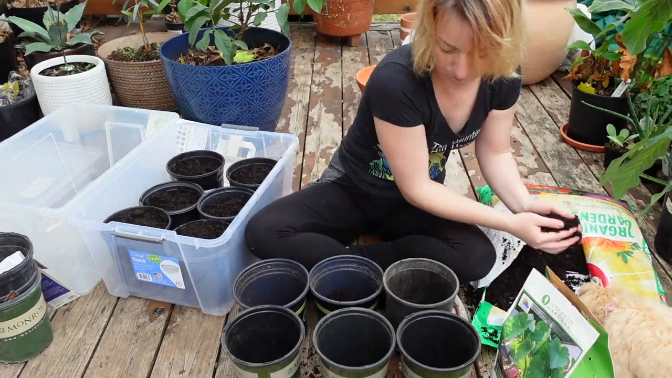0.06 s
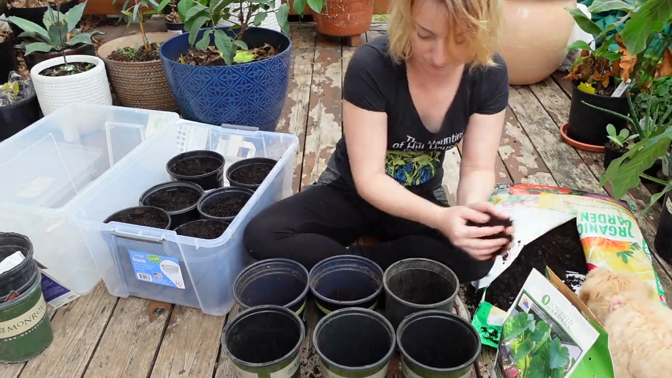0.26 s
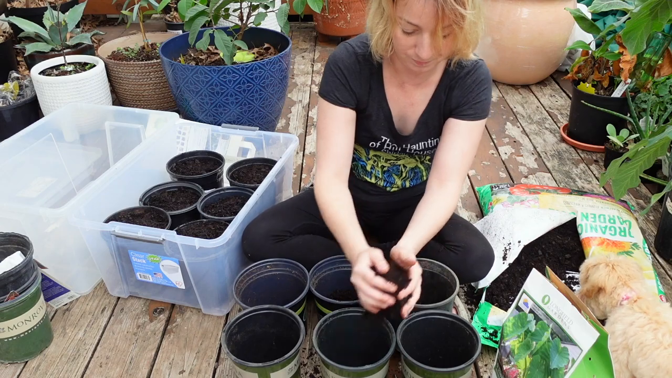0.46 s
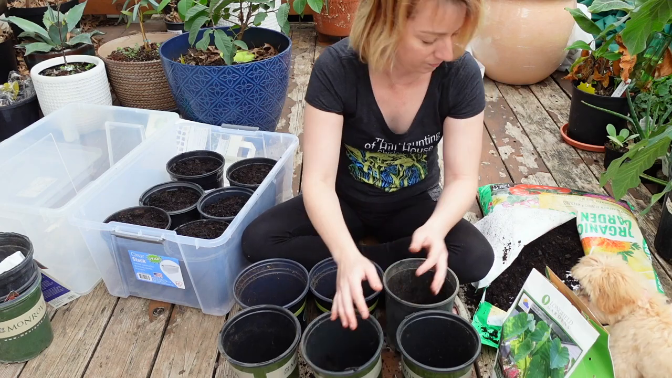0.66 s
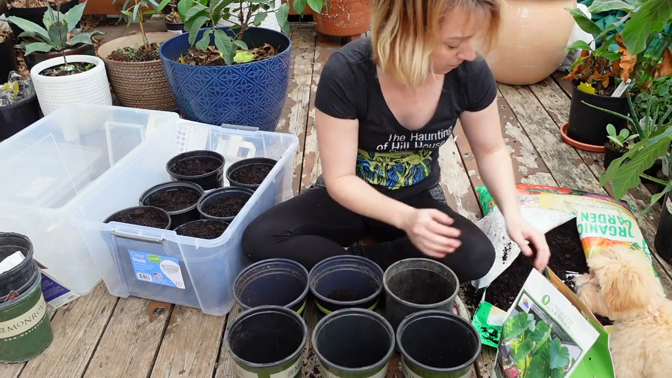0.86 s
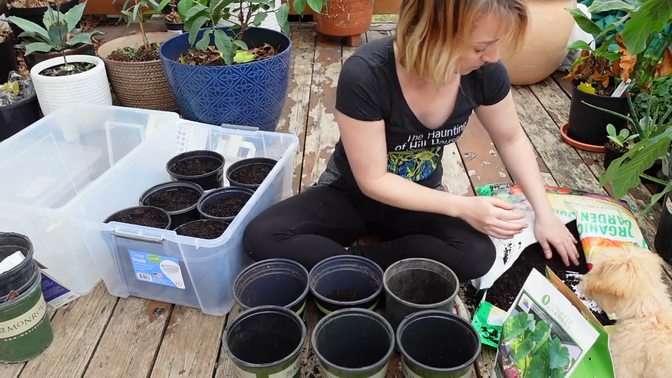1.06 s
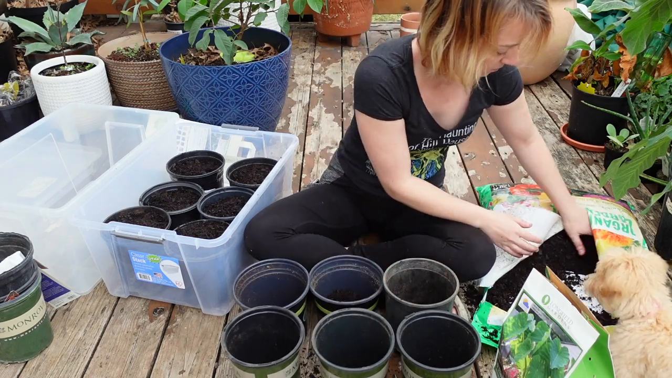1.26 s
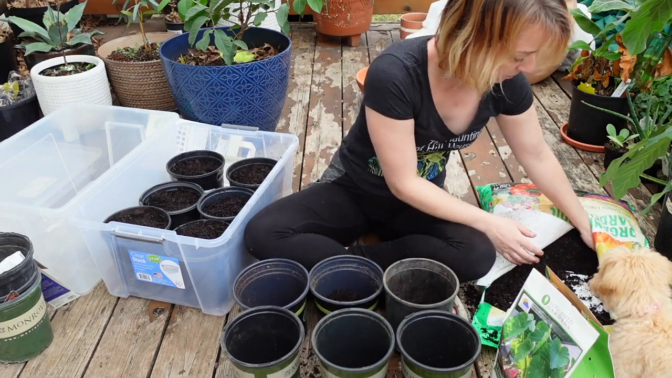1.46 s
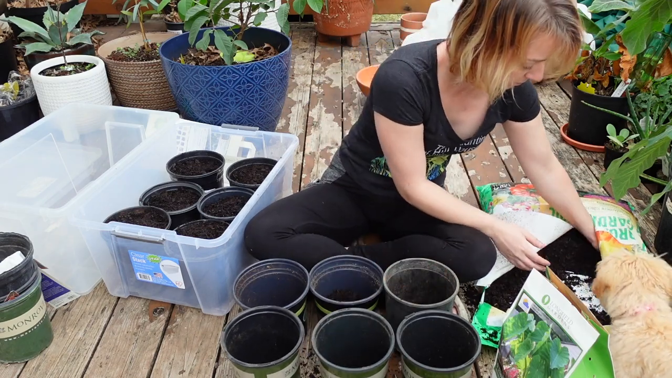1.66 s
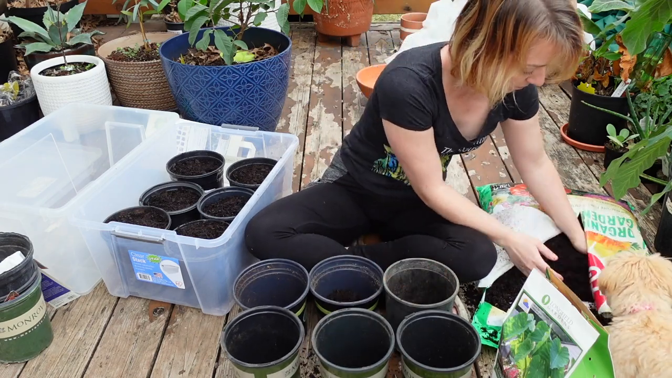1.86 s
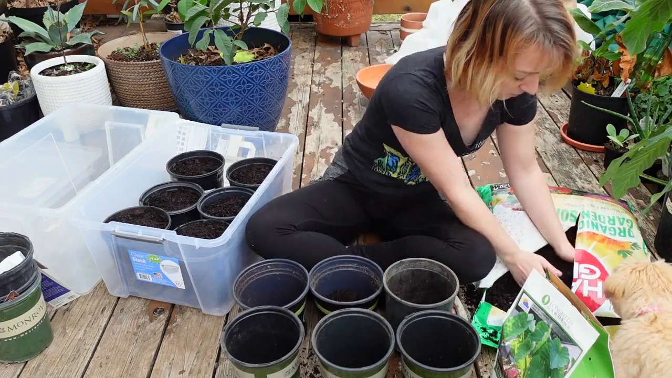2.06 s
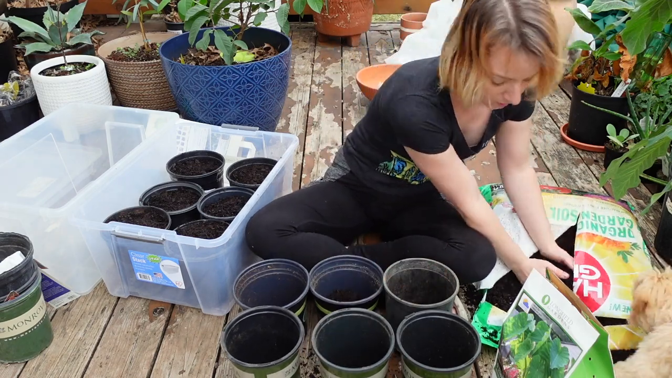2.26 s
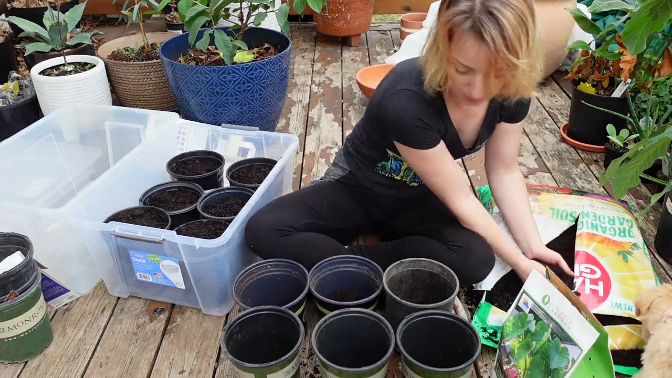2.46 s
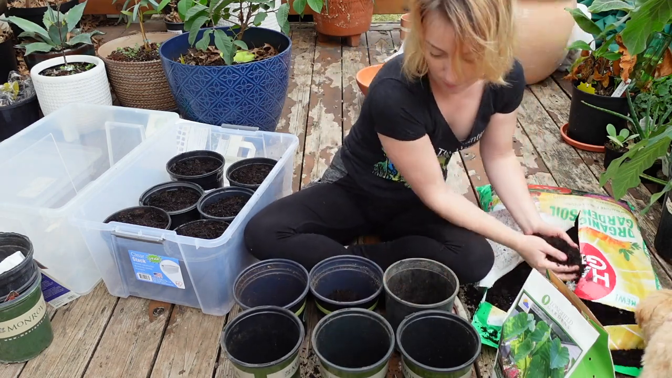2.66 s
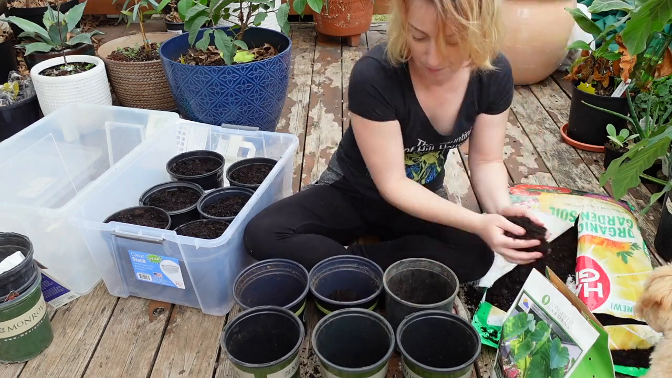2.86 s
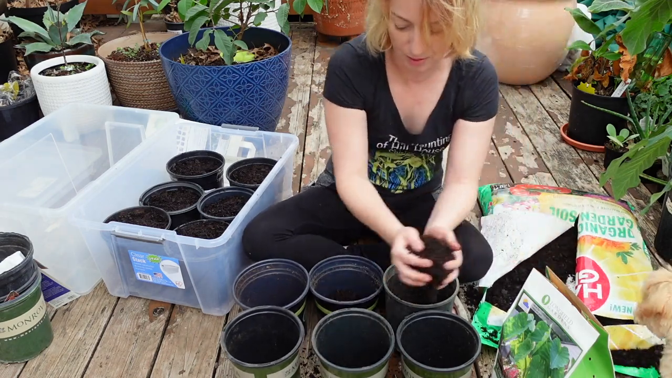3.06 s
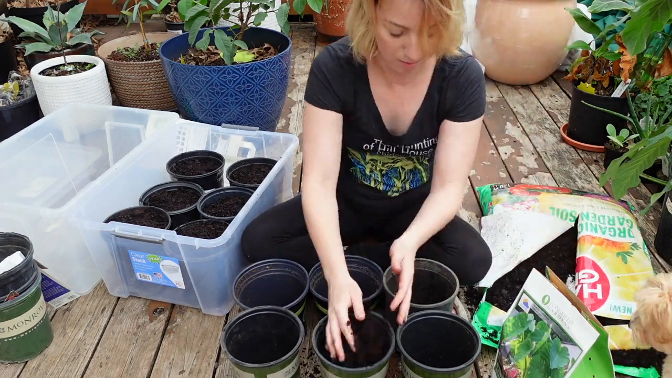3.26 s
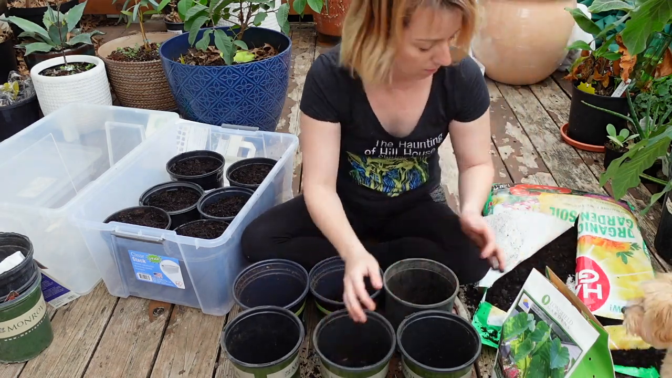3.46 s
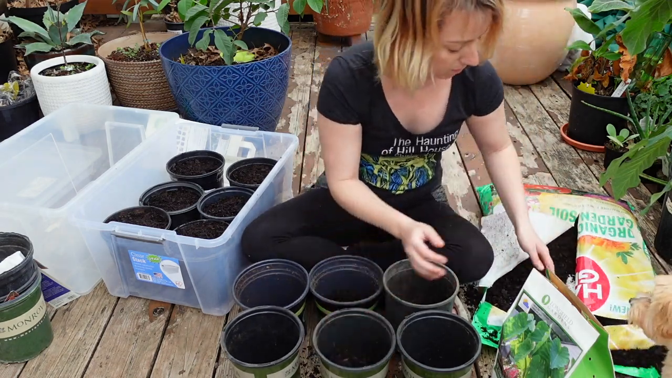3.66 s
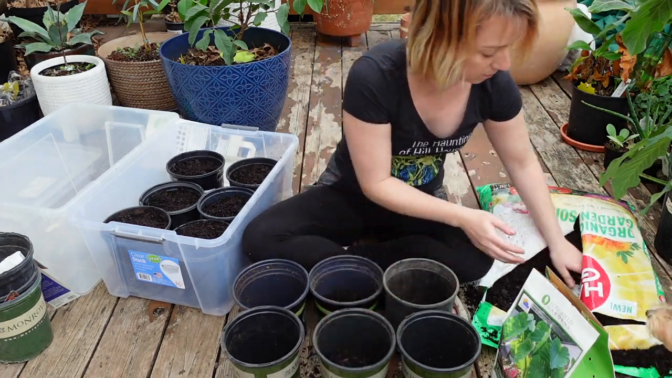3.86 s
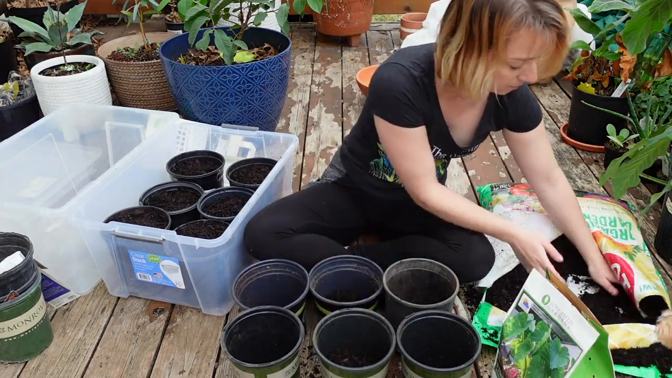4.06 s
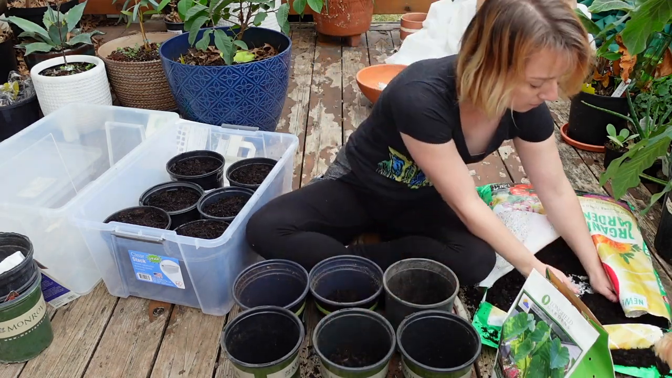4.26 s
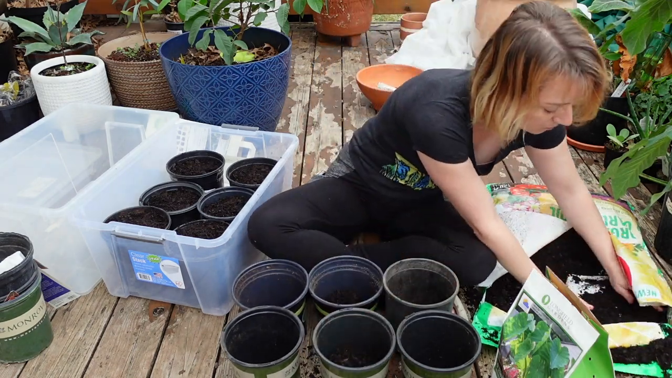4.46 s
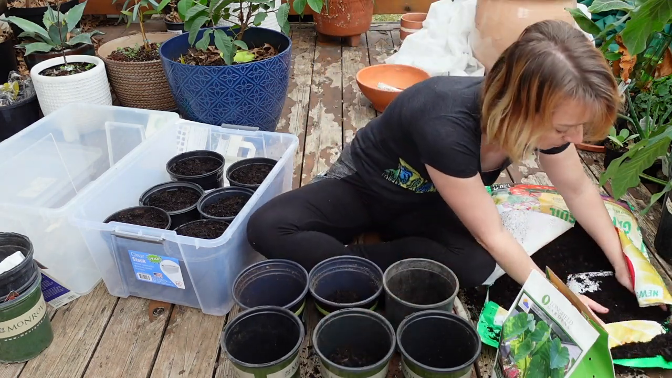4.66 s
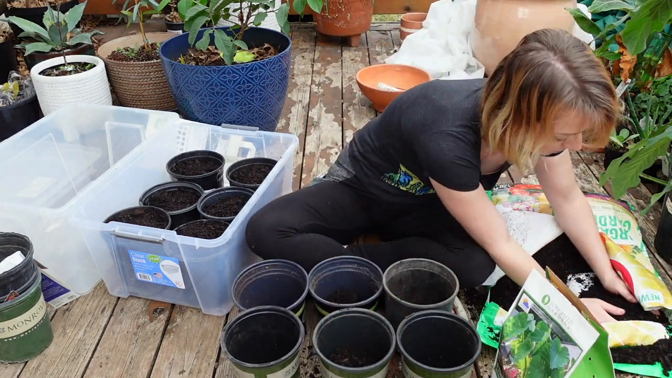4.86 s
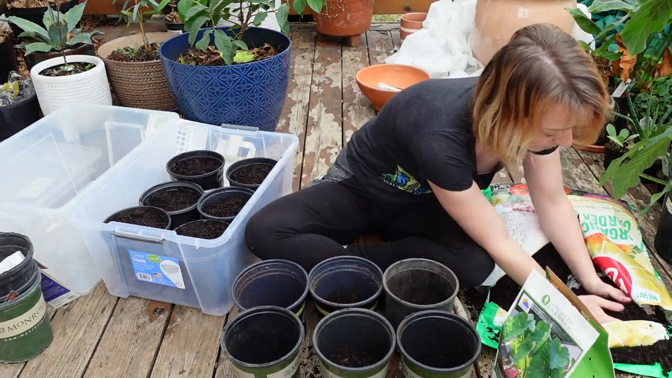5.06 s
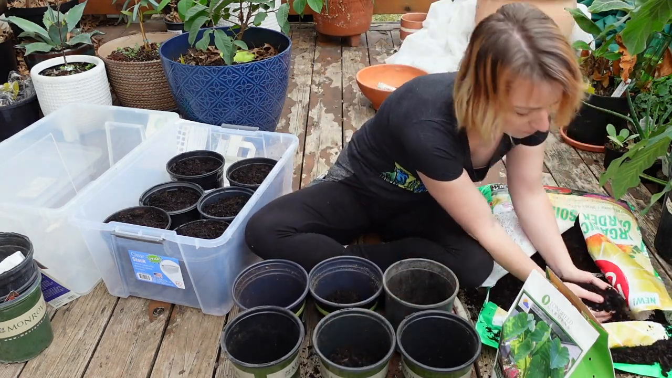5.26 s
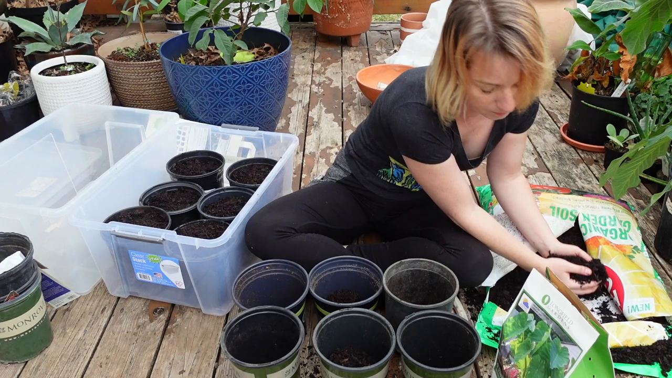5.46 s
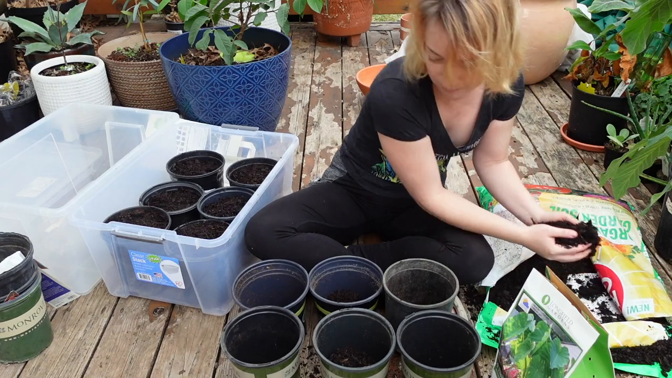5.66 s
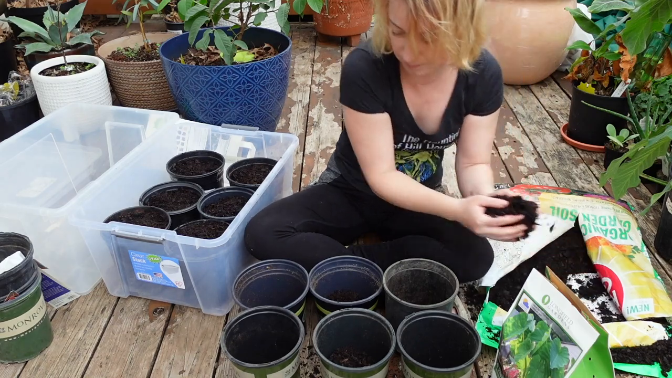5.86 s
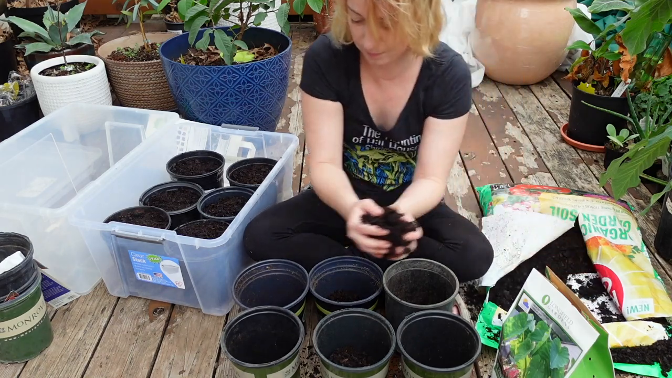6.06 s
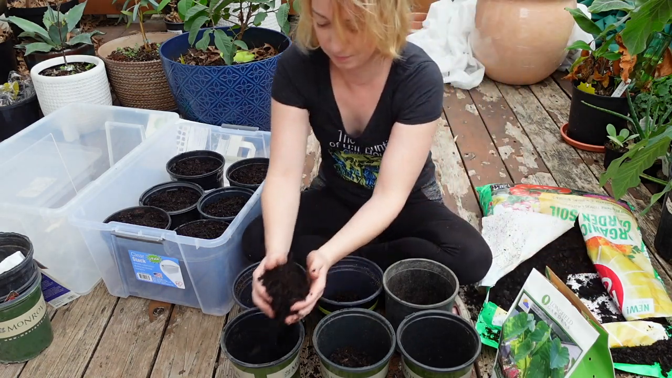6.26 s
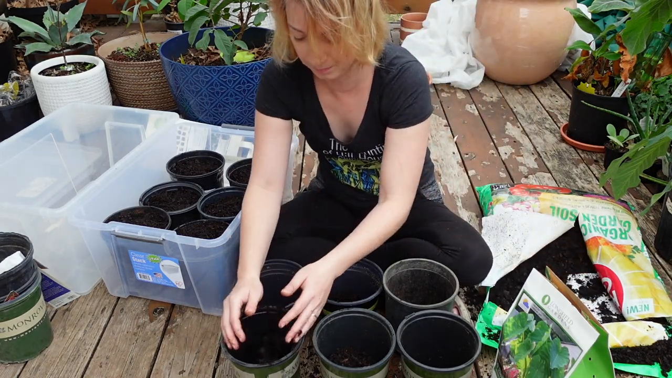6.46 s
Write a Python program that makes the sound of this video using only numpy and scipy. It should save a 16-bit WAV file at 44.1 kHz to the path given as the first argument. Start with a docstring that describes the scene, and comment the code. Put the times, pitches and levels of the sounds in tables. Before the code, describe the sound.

Hands scrape dry soil from a crinkling plastic bag and drop it crisply into thin pots while a songbird whistles falling phrases outdoors.

```python
"""Potting soil by hand

Hands dig dry soil out of a plastic bag (ticks and hiss ring a bank of bands) and drop it into thin plastic
pots on a deck (crumbs ring wall and hollow); single crumbs snap and bumped pots boom.
A songbird whistles falling three-step phrases and a warble, others chirp, a far motor whines (gliding near
sines), a far hammer knocks wood; scattered reflections echo all but the motor, over distant traffic and leaves."""
import sys
import numpy as np
from scipy import signal
from scipy.io import wavfile
from scipy.ndimage import uniform_filter1d, map_coordinates

SR = 44100
rng = np.random.default_rng(int(sys.argv[2]) if len(sys.argv) > 2 else 0)


def master_out(mix):
    """Clip the mix to full scale and print it as 16-bit PCM to the path in sys.argv[1]."""
    frames = np.transpose(np.atleast_2d(mix))
    ceiling = np.clip(frames, -1, 1)
    pcm = np.round(ceiling * 32767).astype(np.int16)
    wavfile.write(sys.argv[1], SR, pcm)


N = 287532


def undb(db):
    """dB to gain."""
    return 10 ** (np.asarray(db) / 20)


def level(x, rms_db):
    """Set the rms."""
    return x * undb(rms_db) / np.sqrt(np.mean(x ** 2))


def ring(x, hz, width_hz):
    """One resonance, gain 1 at its centre."""
    return signal.lfilter(*signal.iirpeak(hz, hz / width_hz, fs=SR), x)


def ring_twice(x, hz, width_hz):
    """The same resonance in series: steeper skirts."""
    return ring(ring(x, hz, width_hz), hz, width_hz)


def modes(x, table):
    """A body that rings at several resonances."""
    return sum(undb(db) * ring(x, hz, width_hz) for hz, width_hz, db in table)


def colour_db(spectrum, hz):
    """Read a spectrum at hz, linear in dB over log frequency."""
    points = np.array(spectrum, float)
    return np.interp(np.log(hz), np.log(points[:, 0]), points[:, 1])


def walk(rate_hz):
    """Random levels, one every 1 / rate_hz s, joined by straight slopes; spread near 1."""
    hold = int(SR / rate_hz)
    steps = np.repeat(rng.standard_normal(N // hold + 1), hold)
    return uniform_filter1d(steps, hold)[:N]


def grains(rate_hz, spread_db):
    """Random ticks, most small and a few large; rms 1."""
    hit = rng.random(N) < rate_hz / SR
    size = undb(spread_db * np.minimum(rng.exponential(size=N), 3.5))
    return level(hit * size * rng.standard_normal(N), 0)


def crumble(spectrum, tilt_db, rate_hz, spread_db, hiss_db, shared, clump_db):
    """Half-octave bands rung by common and own ticks over a sliding hiss; all come in clumps."""
    common, clumps, out = grains(rate_hz, spread_db), walk(45), 0
    for hz in 250 * 2 ** np.arange(0, 6, .5):
        hiss = undb(hiss_db) * rng.standard_normal(N)
        ticks = shared * common + grains(rate_hz, spread_db) + hiss
        band = ring_twice(ticks, hz, hz * 0.53)
        # tilt: full below 1.5 kHz, none above 5 kHz
        low = np.clip(np.log(5000 / hz) / np.log(5000 / 1500), 0, 1)
        band_db = colour_db(spectrum, hz) + low * tilt_db + clump_db * clumps + 4.67 * walk(22)
        out = out + band * undb(band_db)
    return out


STROKE_DROP_DB = -20  # reached one swell before and one fade after the peak
STROKE_ROUND = 1.25  # above 1 the peak is rounder and the ends steeper


def strokes(table):
    """Each stroke swells and fades by STROKE_DROP_DB in its times; the loudest sets the colour."""
    step = 64
    t = np.arange(0, N + step, step) / SR
    s, db, swell_s, fade_s, colour = np.array(table, float).T[:, :, None]
    away = np.maximum((s - t) / swell_s, (t - s) / fade_s)
    power = undb(2 * (db + STROKE_DROP_DB * away ** STROKE_ROUND)) + 1e-18
    total = power.sum(axis=0)
    mean_colour = (power * colour).sum(axis=0) / total
    return [np.interp(np.arange(N) / SR, t, v) for v in (np.sqrt(total), mean_colour)]


def blows(table, contact_s, boost_db):
    """A short smooth push for each (time [s], level [dB]) row."""
    ticks = np.zeros(N)
    for s, db in table:
        ticks[int(s * SR)] = undb(db + boost_db)
    return np.convolve(ticks, np.hanning(int(contact_s * SR) + 2))[:N]


def curves(tables, fade_s):
    """Columns of (time [s], value, ..) tables per sample, and a gate open inside each table."""
    t = np.arange(N) / SR
    rows = np.concatenate([np.array(rows, float) for rows in tables])
    gate = sum(np.clip(np.minimum(t - rows[0][0], rows[-1][0] - t) / fade_s + 1, 0, 1) for rows in tables)
    return [np.interp(t, rows[:, 0], column) for column in rows.T[1:]] + [np.minimum(gate, 1)]


def whistle(tables, fade_s, octave_db):
    """A near sine on a gliding pitch, from (time [s], pitch [Hz], rms level [dB]) tables."""
    hz, db, gate = curves(tables, fade_s)
    phase = 2 * np.pi * np.cumsum(uniform_filter1d(hz, size=330)) / SR
    tone = np.sin(phase) + undb(octave_db) * np.sin(2 * phase)
    return np.sqrt(2) * gate * undb(db) * tone


def stereo(x, pan_db):
    """Place a sound by its left minus right level."""
    return x * undb(np.multiply.outer([.5, -.5], pan_db + np.zeros(N)))


def delayed(x, s, db):
    """One reflection."""
    return undb(db) * np.concatenate([np.zeros(int(s * SR)), x])[:N]


def echoes(x, t60_s, db, gap_s, likeness, patchy_db):
    """Scattered reflections after a gap, partly different left and right."""
    t = np.arange(SR) / SR
    noise = rng.standard_normal((3, SR))
    tail = noise[0] * np.sqrt(np.clip(likeness, 0, 1)) + noise[1:] * np.sqrt(np.clip(1 - likeness, 0, 1))
    tail = tail * undb(-60 * t / t60_s + patchy_db * walk(57.0)[:SR]) * (t > gap_s)
    tail = tail * undb(db) / np.sqrt(np.sum(tail ** 2) / 2)
    return signal.fftconvolve(np.broadcast_to(x, (2, N)), tail, axes=1)[:, :N]


# hand strokes in the bag: (peak time [s], relative level [dB], swell [s], fade [s],
# low rustle of the slack sheet against the high [dB])
DIG_STROKES = [(.126, -58.5, 0.35, .02, 11), (.208, -55, 0.051, .07, 3), (.308, -50, 0.0145, 0.027, -1),
               (.428, -33, 0.021, 0.022, -20.5), (.46, -52, 0.034, 0.26, 2),
               (1.106, -35.5, 0.043, 0.29, -16), (1.17, -35.5, 0.059, 0.22, 4.5),
               (1.286, -37.5, 0.19, 0.19, -32.5), (1.35, -29.5, 0.13, 0.24, 5.5),
               (1.5, -33, 0.17, 0.35, -13.5), (1.582, -30, .012, 0.18, -1.5),
               (1.745, -30.5, 0.048, 0.12, -17.5), (1.778, -27, 0.042, 0.058, -1.5),
               (1.826, -26, .014, 0.17, -9), (1.9, -35.5, 0.036, 0.23, -5),
               (1.976, -22.5, 0.052, 0.037, -15), (2.07, -49.5, 0.16, 0.37, 5.5),
               (2.264, -40.5, 0.077, .3, 1.5), (2.522, -55.5, .1, 0.05, 7.5), (2.9, -61, 1, 0.3, 13),
               (3.0, -50, 0.091, 0.067, 4.5), (3.918, -36.5, 0.11, .12, -11.5),
               (4.056, -36.5, 0.035, 0.071, 2), (4.148, -44, 0.1, 0.016, 9), (4.2, -61.5, 0.24, 0.34, 20),
               (4.51, -49, 0.11, 0.062, 18.5), (4.58, -28.5, 0.067, 0.15, 3.5),
               (4.724, -31, 0.079, 0.039, -3), (4.774, -25.5, 0.057, 0.097, -9),
               (4.81, -33, 0.077, 0.46, -4), (5.0, -36, 0.28, 0.094, -22), (5.2, -39.5, 0.11, 0.42, -2),
               (5.446, -28, 0.0048, 0.017, -15), (5.54, -59.5, 0.049, 0.15, 14),
               (6.058, -42.5, 0.0048, 0.038, -13.5), (6.11, -45.5, 0.05, 0.092, -10),
               (6.268, -33.5, 0.019, .06, -29.5)]
# bag rustle spectrum: (frequency [Hz], relative density [dB per Hz])
BAG_SPECTRUM = [(120, -41), (200, 6.5), (400, -13.5), (631, 3.5), (830, -7.5), (961, -6), (1150, 3),
                (1920, -7.5), (2480, 0), (8130, -10.5), (15700, -48)]


def bag():
    """The plastic sheet crackles and soil slides over it; single grains stand out."""
    effort, low_db = strokes(DIG_STROKES)
    rustle = crumble(BAG_SPECTRUM, low_db + 1.5, rate_hz=1100., spread_db=1.0, hiss_db=0.5,
                     shared=0.54, clump_db=1.5)
    crackle = level(ring_twice(grains(250., 3.), 3500, 4000), -9.)
    return stereo((level(rustle, 5.34) + crackle) * effort, -2.76)


# soil clumps falling into a pot: (peak time [s], relative level [dB], swell [s], fade [s],
# hollow thud gain [dB])
POUR_STROKES = [(.614, -17.5, 0.008, 0.22, -23), (.684, -12, 0.067, 0.051, -16),
                (.79, -30, 0.036, 0.085, -15), (.84, -27.5, 0.0069, .04, -16),
                (.87, -47.5, .04, 0.034, -30), (3.279, -26.5, 0.0064, 0.045, -40),
                (3.298, -23.5, 0.0083, 0.049, -44), (3.33, -22.5, 0.015, 0.17, -9),
                (3.4, -22.5, .015, 0.094, -8), (3.496, -37, .1, 0.095, -7.5), (6.085, -47, .01, 0.11, -24),
                (6.31, -36.5, 0.0066, 0.023, -12), (6.345, -33.5, .02, 0.45, -37),
                (6.418, -18, 0.011, 0.078, -19.5), (6.465, -19, 0.056, 0.54, -10.5),
                (6.51, -23, 0.055, .1, -1)]
# soil patter spectrum: (frequency [Hz], relative density [dB per Hz])
SOIL_SPECTRUM = [(530, -28), (900, -23.5), (1080, -26), (1170, -22), (1870, 9.5), (2150, -16.5),
                 (3010, -0.5), (9050, -24), (15700, -59)]
# pot wall resonances: (centre [Hz], width [Hz], relative gain [dB])
POT_WALL = [(1915, 42, 9.5), (1822, 32, 8.5), (2196, 40, -7), (3370, 110, -31), (3490, 84, 4)]
# resonances of the air in the pot, also for bumps(): (centre [Hz], width [Hz], relative gain [dB])
POT_AIR = [(508, 67, -4.5), (627, 59, -1), (800, 240, -7)]


def pour():
    """Crumbs patter on the pot wall and ring it; clods thud in the hollow."""
    flow, thud_db = strokes(POUR_STROKES)
    patter = crumble(SOIL_SPECTRUM, 0, rate_hz=1500., spread_db=3.5, hiss_db=-7.0, shared=0.11, clump_db=3.5)
    wall = level(modes(grains(350., 5.), POT_WALL), -7.0)
    thud = level(modes(grains(400., 1.6), POT_AIR), 0) * undb(thud_db)
    return stereo((level(patter, 0.69) + wall + thud) * flow, -0.48)


# snapping crumbs and creases: (time [s], click peak [dB], centre [Hz],
# treble crack against the click before a 4.5 dB cut [dB], rattle against the click [dB])
SNAP_ROWS = [(0.088, -32, 4300, -36, -2), (0.1311, -30.5, 4180, -34, 4.5), (0.428, -27.5, 2574, -24, 12.5),
             (.5782, -29, 4640, -18, -9), (0.6118, -21, 1970, -20, 8), (.674, 0, 3080, -26, -6),
             (0.687, -5, 2330, -15, -19), (0.715, -11, 1620, -22, 0), (0.766, -21, 3530, 16, -18),
             (0.7847, -17.5, 3030, -21, -10), (0.8038, -20, 1860, -17, -10), (0.8412, -1, 2290, -41.5, -11),
             (1.1092, -21.5, 3200, -22, -1), (1.1398, -18, 3250, -19, 4.5), (1.1713, -17, 1930, -19, 4),
             (1.3336, -15, 1640, -20, -14), (1.3444, -11.5, 2000, -23, -14), (1.3916, -23, 1730, -17, 6),
             (1.407, -14, 2540, -25, -1), (1.577, -16.5, 2470, -21, 6.5), (1.6464, -29, 1320, -23, 0),
             (1.758, -21, 2670, -22, 5), (1.7757, -15.5, 2500, -22, 1), (1.826, -17, 2560, 6, -4),
             (1.8341, -13.5, 2680, -20, -1), (1.936, -17, 2760, -14, 2), (1.965, -14, 3600, -13, -1),
             (1.9775, -8, 4600, 5, -12), (2.0288, -25.5, 2800, -21, -1), (2.2472, -24, 2900, -19, 0),
             (2.26, -22.5, 3040, -20, 1), (2.513, -15.5, 2310, -39, 0.5), (2.6352, -18.5, 2270, -44, -4.5),
             (3.0117, -12.5, 2995, -41, -1.5), (3.0927, -31.5, 3100, -22, 5.5),
             (3.2186, -11, 2280, -34, -2.5), (3.2304, -20, 2370, -37, -8), (3.277, -19, 2030, -25, 6),
             (3.291, -17, 1730, -28, -12), (3.2995, -1, 1830, -40, -1), (3.331, -6, 2690, -27, 4),
             (3.403, -8.5, 1860, -31, -13), (3.418, -14, 3800, -12, -4), (3.4273, -14, 3500, -26, -4),
             (3.4965, -23.5, 1270, -25.5, 6), (3.524, -25.5, 2823, -23, -14),
             (4.4917, -24.5, 1370, -27, -6), (4.6304, -19, 1510, -24, 11), (4.724, -26, 1380, -14, -11),
             (4.7553, -18.5, 2430, -17, 3), (4.772, -16.5, 1500, -13, 2), (4.786, -13.5, 4000, -17, -12),
             (4.814, -17, 1940, -22, -11), (4.875, -18, 4500, -14, -15), (5.293, -25, 4280, -21, -0.5),
             (5.446, -13, 2880, -2, -5.5), (5.557, -37, 2040, -19.5, -11), (6.114, -23.5, 1760, 1, 2),
             (6.2546, -33, 4140, -20, -2), (6.2646, -23.5, 3900, -20, 5), (6.307, -21.5, 3660, -19, -3),
             (6.334, -18.5, 2240, -23, -2), (6.346, -11, 2160, -31, 6), (6.3674, -20, 2300, -26, -2),
             (6.3916, -27, 1880, -10, -2), (6.4167, -5.5, 1920, -23, 3), (6.451, -10, 2000, -18, 8),
             (6.4711, 0.5, 1870, -24, -3), (6.4834, -8.5, 1750, -18, 9), (6.5077, -5.5, 1580, -19, -2)]
# where the hands are: (time [s], left minus right [dB])
HAND_PAN = [(0, -7), (.8, 0), (1.35, -2), (1.7, -5.5), (2.3, -2.5), (3.4, -1), (4.7, -2.5), (6.0, -5),
            (6.3, 8.5), (6.5, -3)]


def snaps():
    """A broad click coloured by its own pitch, with a treble crack and a short rattle."""
    size = 4096
    out, t = np.zeros((2, N + size)), np.arange(size) / SR
    noise = rng.standard_normal((len(SNAP_ROWS), 3, size))
    for (s, db, hz, crack_db, rattle_db), (break_up, grit, shake) in zip(SNAP_ROWS, noise):
        push = np.exp(-t / 0.000073) + .5 * break_up * np.exp(-t / 0.00035)
        click = ring_twice(push, hz, 0.48 * hz) + 0.27 * ring(push, hz, 0.053 * hz)
        crack = ring_twice(grit, 8000, 7000) * np.exp(-t / 0.00035) * undb(crack_db - 4.5)
        rattle = ring_twice(shake, hz, 0.5 * hz) * np.exp(-t / 0.011) * undb(rattle_db)
        sound = click / np.max(np.abs(click)) + crack + rattle
        start, pan_db = int(s * SR), np.interp(s, *np.array(HAND_PAN).T)
        out[:, start:start + size] += np.outer(undb([db + pan_db / 2, db - pan_db / 2]), sound)
    return out[:, :N]


# a hand bumps a pot: (time [s], relative level [dB])
BUMP_ROWS = [(1.171, -30), (1.333, -31), (1.512, -15.5), (1.578, -41), (1.645, -26.5), (1.761, -33),
             (2.514, -24), (3.333, -18), (3.557, -25.5), (4.143, -14.5), (6.415, -26)]


def bumps():
    """The air in the pot booms briefly after a soft, round push."""
    push = blows(BUMP_ROWS, contact_s=0.0011, boost_db=8.3)
    return modes(modes(push, POT_AIR), POT_AIR)


# each singing: (start [s], gain [dB], lift of the first pitch [Hz], extra gain of the first step [dB],
# extra gain of the last step [dB])
SONG_STARTS = [(0.134, 0, 60, -0.5, -0.5), (2.873, -3, -1, 2, -1.5), (4.116, -3, -71, 2, 1.5)]
# falling three-step phrase: (time after its start [s], level before the song gains [dB])
PHRASE_LEVELS = [(0, -45.5), (0.034, -21), (.091, -30.5), (0.11, -25), (.14, -23.5), (0.187, -21),
                 (.207, -24.5), (0.223, -29.5), (.275, -31.5), (.3, -43)]
# pitch at the phrase times, before the lift: [Hz]
PHRASE_PITCH_HZ = [3860, 3800, 3700, 3180, 3160, 3145, 2500, 2345, 2315, 2325]
# warbled call with a dip: (time [s], pitch [Hz], level [dB])
WARBLE_CALL = [(3.557, 2330, -35.5), (3.598, 2613, -27), (3.62, 2717, -24), (3.639, 2610, -24),
               (3.65, 2390, -31), (3.661, 2028, -34), (3.69, 2546, -30), (3.712, 2543, -23),
               (3.762, 2685, -44.5)]


def songbird():
    """The same phrase, begun higher or lower, outer steps stronger or weaker; once a warble."""
    s, db = np.array(PHRASE_LEVELS, float).T
    first, last = s <= s[2], s >= s[6]
    calls = [np.array(WARBLE_CALL)]
    for start, gain_db, lift_hz, first_db, last_db in SONG_STARTS:
        hz = PHRASE_PITCH_HZ + lift_hz * np.clip(1 - s / s[3], 0, 1)
        calls.append(np.c_[start + s, hz, db + gain_db + first * first_db + last * last_db])
    return whistle(sorted(calls, key=lambda rows: rows[0][0]), fade_s=0.0054, octave_db=-48)


# faint notes of further birds: (time [s], length [s], first pitch [Hz], last pitch [Hz],
# peak level before the waver and 2 dB cut [dB], octave against the note [dB])
CHIRP_NOTES = [(0.888, .05, 7700, 5370, -47.5, -40), (0.913, 0.103, 2400, 2424, -50, -7),
               (2.033, 0.076, 3050, 2940, -46, -40), (2.26, 0.046, 3100, 3020, -42, -42),
               (4.862, 0.025, 4600, 5020, -32.5, -40), (4.894, 0.034, 4130, 4000, -32.5, -40),
               (4.93, 0.028, 4040, 3750, -32, -39), (4.998, 0.069, 3260, 3390, -45.5, -45)]
CHIRP_RISE_DB, CHIRP_FADE_DB, CHIRP_SWELL_S = -6, -10, 0.02  # start, end against the peak; longest swell


def chirps():
    """Each note swells quickly, glides most of its way by 0.6 of its length and dies away; levels waver."""
    out = 0
    for s, length_s, hz0, hz1, db, octave_db in CHIRP_NOTES:
        note = [(s, hz0, db + CHIRP_RISE_DB),
                (s + min(CHIRP_SWELL_S, length_s / 3), .8 * hz0 + 0.25 * hz1, db),
                (s + .6 * length_s, .2 * hz0 + .8 * hz1, db + CHIRP_FADE_DB / 3),
                (s + length_s, hz1, db + CHIRP_FADE_DB)]
        out = out + whistle([note], 0.0027, octave_db)
    return out * undb(-2 + 3 * walk(120))


def echoed_birds():
    """Direct song, one close wall reflection and a wavering, pitch-smeared tail."""
    birds = songbird() + chirps()
    # on a glide, song and wall reflection beat
    sung = stereo(birds, -4.0) + stereo(delayed(birds, .011, -4.5), -1.)
    # moving air smears the pitch
    drift = 1.5 * uniform_filter1d(walk(60), size=400)
    blurred = map_coordinates(birds, [np.arange(N) + drift], order=1)
    tail = echoes(blurred, t60_s=0.55, db=-5.0, gap_s=0.0078, likeness=0.89, patchy_db=2.0)
    # moving leaves make the tail waver
    return sung + tail * undb(3.2 * walk(70))


# runs of the far motor: (time [s], pitch [Hz], level before flicker [dB])
MOTOR_RUNS = [
    [(0, 482, -63.5), (.3, 455, -61.5), (.58, 442, -68)],
    [(2.0, 462, -57), (2.2, 548, -58.5), (2.4, 510, -60), (2.67, 532, -53), (3.3, 528, -56.5),
     (3.9, 530, -55.5), (4.5, 532, -53), (5.1, 527, -53), (5.5, 532, -53), (6.0, 526, -60.5),
     (6.52, 526, -48)],
]


def motor():
    """A far motor whines on a wandering pitch with a flickering level."""
    return whistle(MOTOR_RUNS, fade_s=.1, octave_db=-30) * undb(2.2 * walk(14))


# far hammer blows: (time [s], relative level [dB])
KNOCK_ROWS = [(3.999, -19), (4.556, -23), (4.591, -19), (5.095, -20.5)]
# struck wood, high mode then low, each applied twice: (centre [Hz], width [Hz], gain per pass [dB])
BOARD_MODES = [(834, 167, -3), (642, 166, -6.5)]


def hammer():
    """Dull blows on wood with a long train of echoes; the low mode hangs on longest."""
    push = blows(KNOCK_ROWS, contact_s=0.00095, boost_db=20.9)
    high, low = (modes(modes(push, [mode]), [mode]) for mode in BOARD_MODES)
    early = echoes(high, t60_s=0.72, db=5.5, gap_s=0.012, likeness=0.97, patchy_db=3.5)
    late = echoes(low, t60_s=0.97, db=9.0, gap_s=.05, likeness=0.94, patchy_db=3.0)
    return high + low + early + late


# background spectrum: (frequency [Hz], relative density [dB per Hz])
GARDEN_SPECTRUM = [(18, -86), (30, -100), (114, -13.5), (412, -11), (535, -13), (659, -18.5), (903, -15),
                   (1370, -18), (1610, -14.5), (3090, -28), (3520, -26.5), (15700, -70)]
GARDEN_RMS_DB = -52.5


def garden():
    """Distant traffic and leaves: half-octave bands that swell together and flicker alone."""
    out, swell = 0, walk(0.55)
    for hz in 40 * 2 ** np.arange(0, 8.6, .5):
        mid, side = ring_twice(rng.standard_normal((2, N)), hz, hz * 0.47)
        db = colour_db(GARDEN_SPECTRUM, hz) + 0.71 * swell + 1.3 * walk(7.7)
        out = out + undb(db) * (mid + 0.31 * side * np.array([[1], [-1]]))
    return level(out, GARDEN_RMS_DB)


def scene():
    """Near hands and pots are almost dry; the birds come with strong echoes."""
    near = bag() + pour() + snaps() + bumps()
    # small light things give no bass
    near = signal.sosfilt(signal.butter(3, 230, "high", fs=SR, output="sos"), near)
    deck = echoes(near.mean(axis=0), t60_s=0.2, db=-14.0, gap_s=0.0028, likeness=0.96, patchy_db=15.5)
    return near + deck + echoed_birds() + motor() + hammer() + garden()


TOP_HZ = 15800


def record(dry):
    """The camera rounds the loudest peaks and cuts the deep bass and the top."""
    rounded = .85 * np.tanh(dry / .85)
    thin = signal.sosfilt(signal.butter(2, 70, "high", fs=SR, output="sos"), rounded)
    return signal.sosfilt(signal.ellip(10, .2, 80, TOP_HZ, fs=SR, output="sos"), thin)


dry = scene()
out = record(dry)
master_out(out)
```